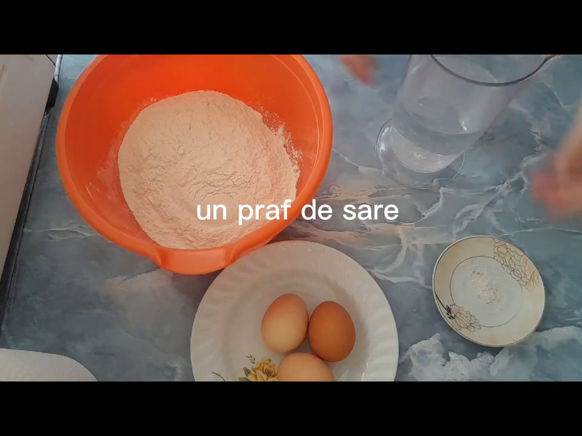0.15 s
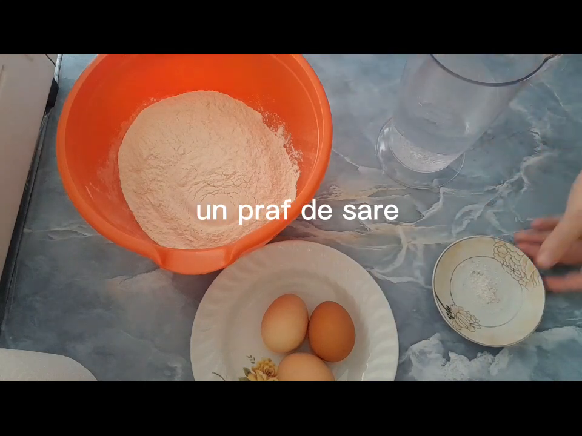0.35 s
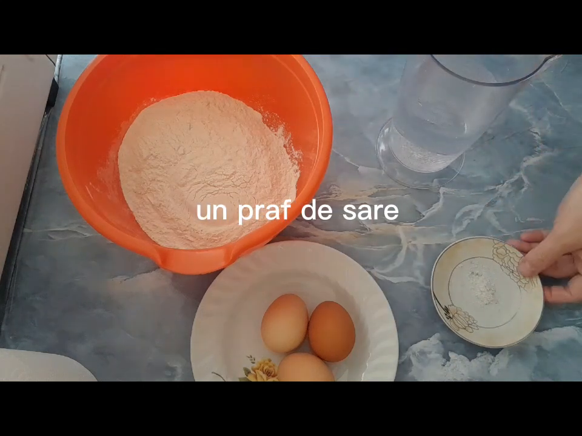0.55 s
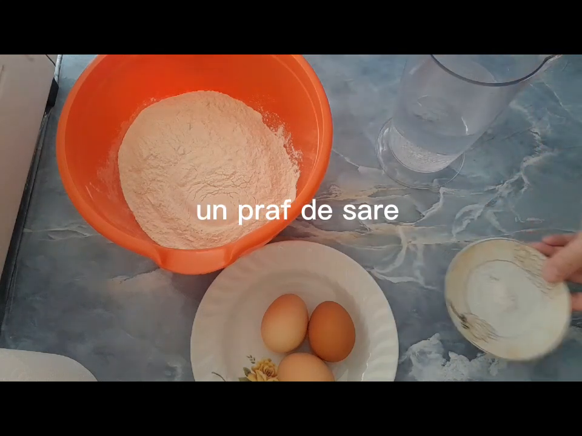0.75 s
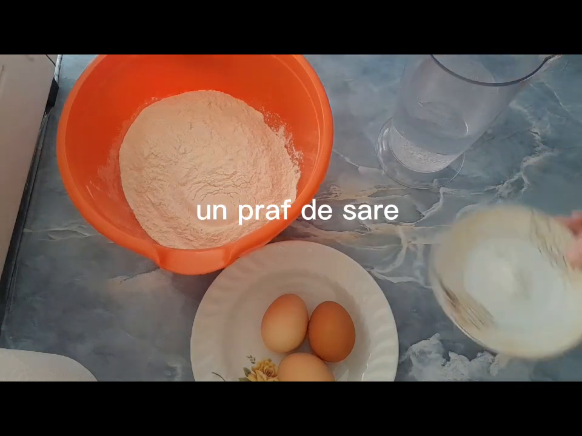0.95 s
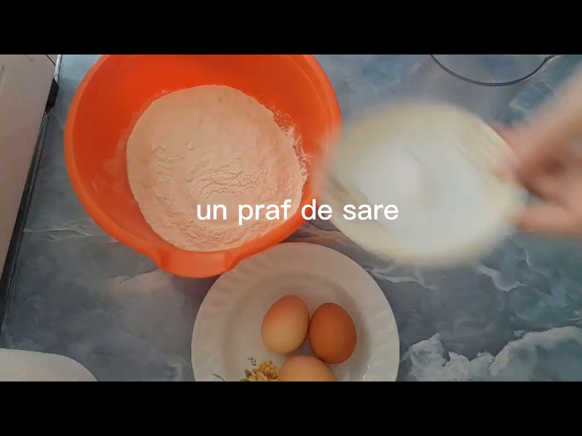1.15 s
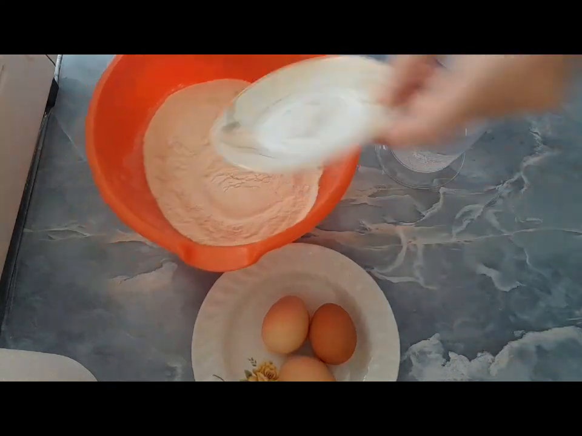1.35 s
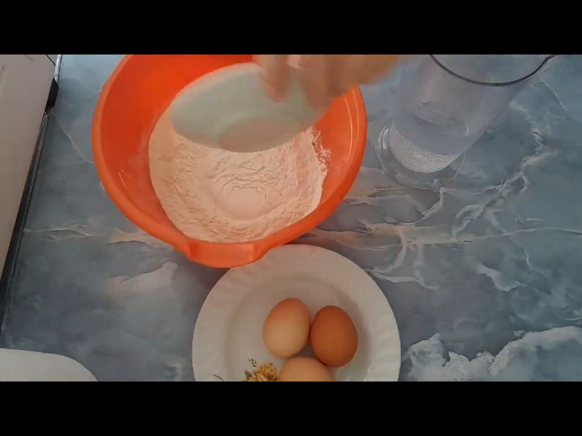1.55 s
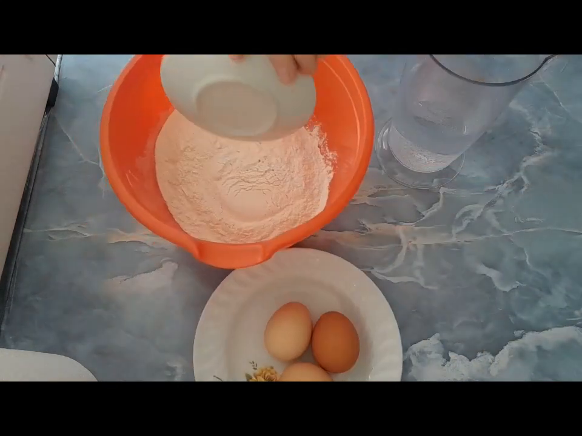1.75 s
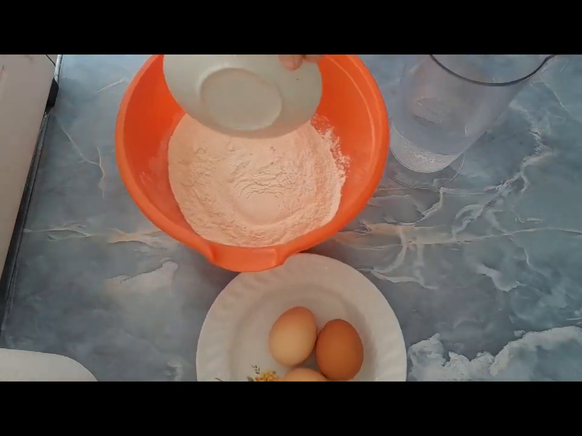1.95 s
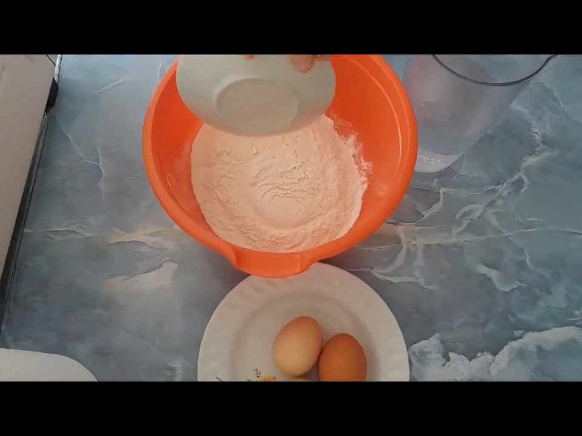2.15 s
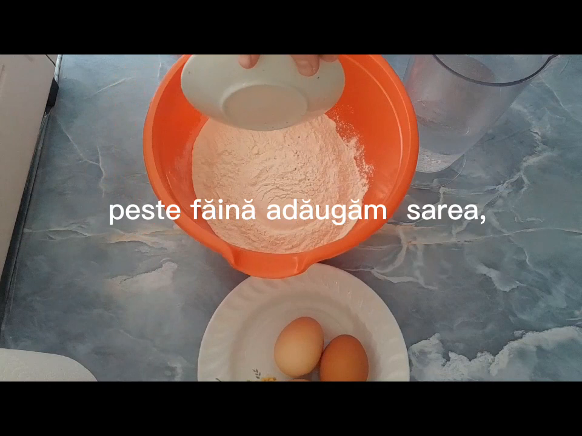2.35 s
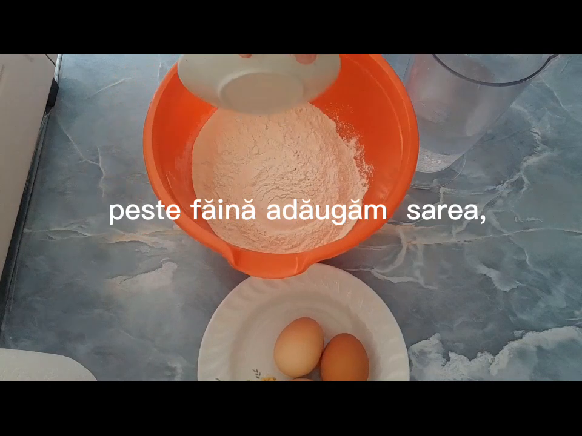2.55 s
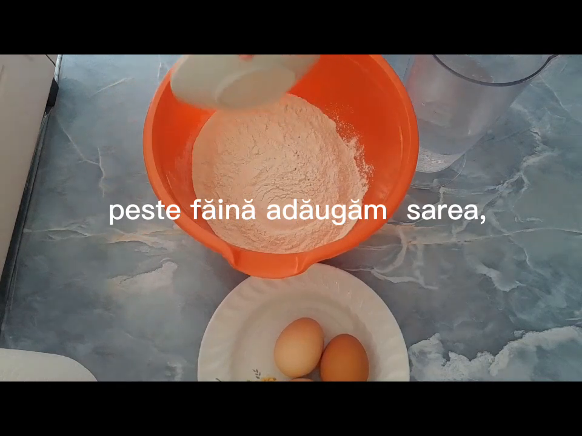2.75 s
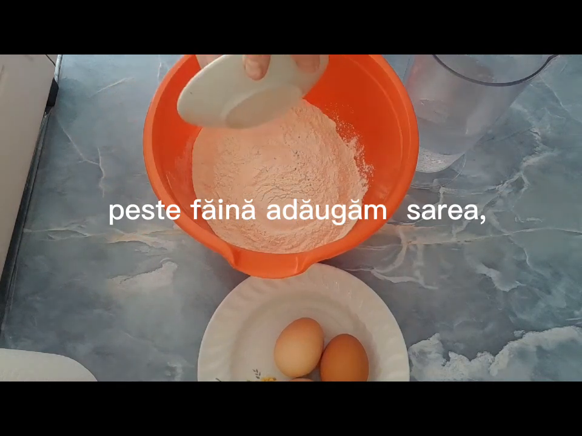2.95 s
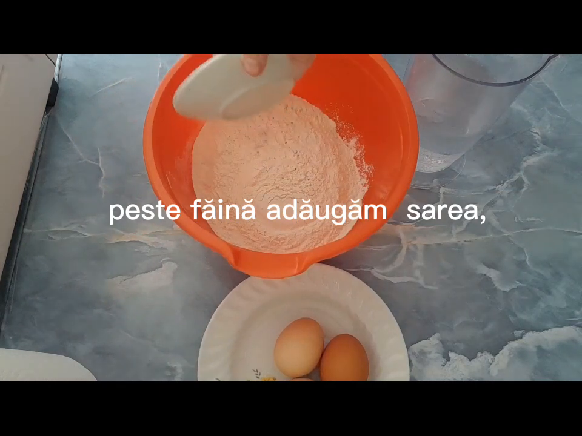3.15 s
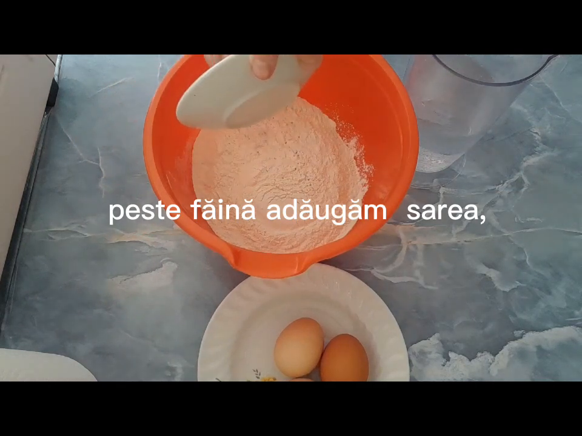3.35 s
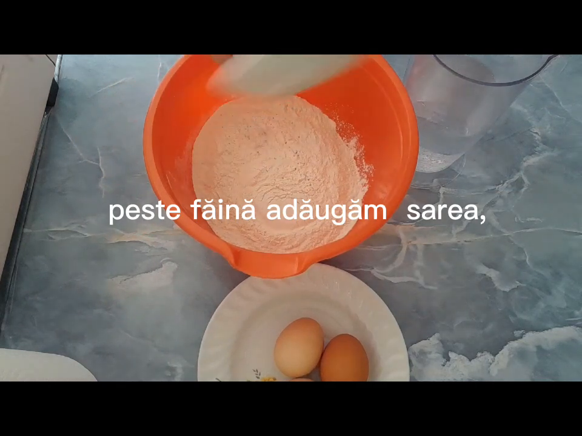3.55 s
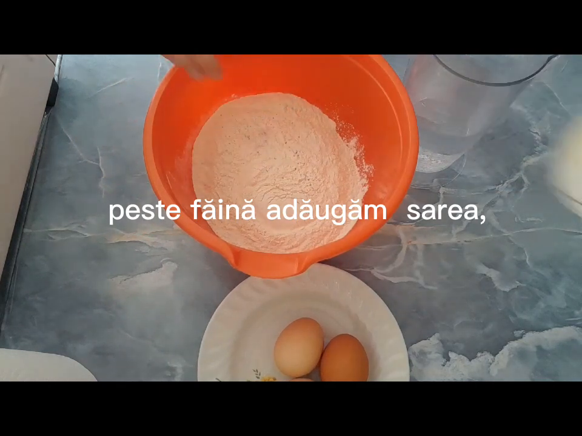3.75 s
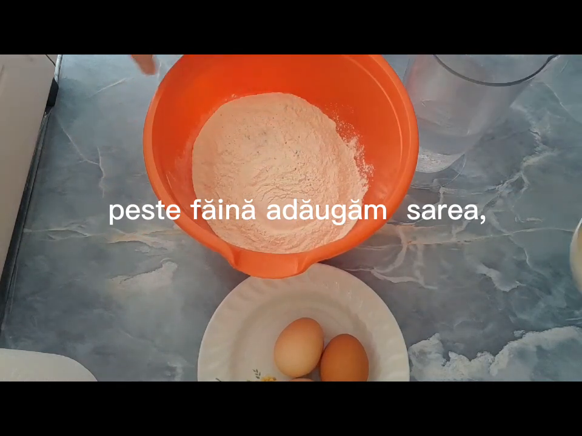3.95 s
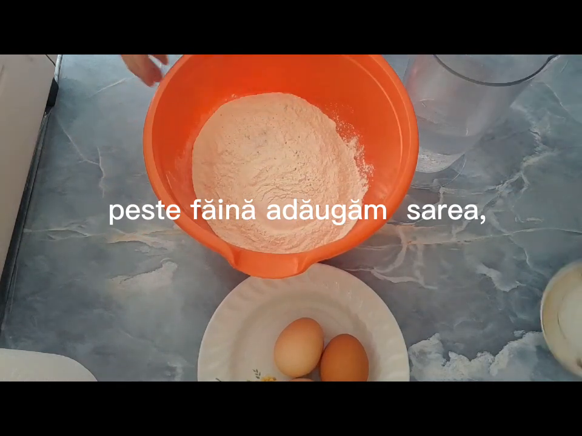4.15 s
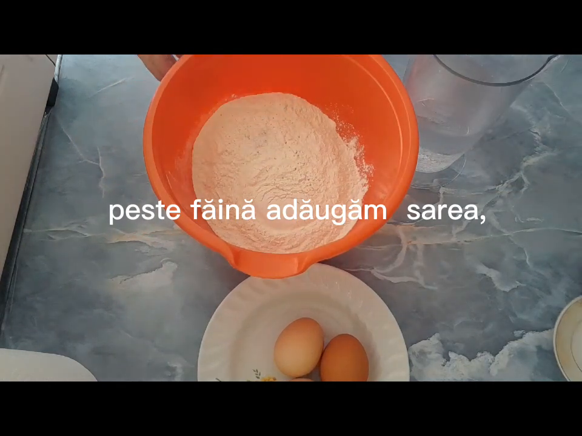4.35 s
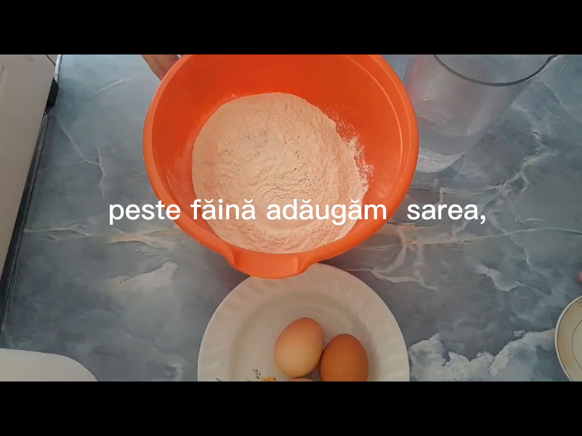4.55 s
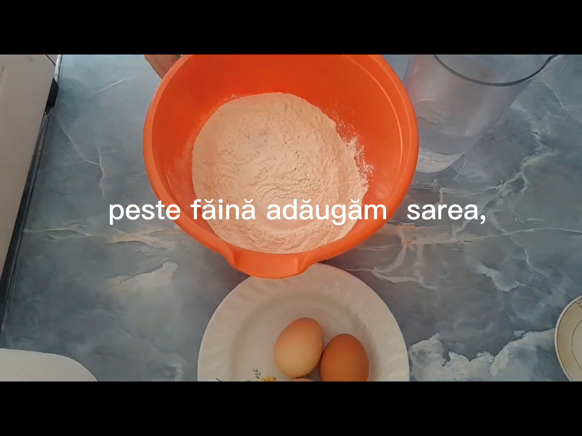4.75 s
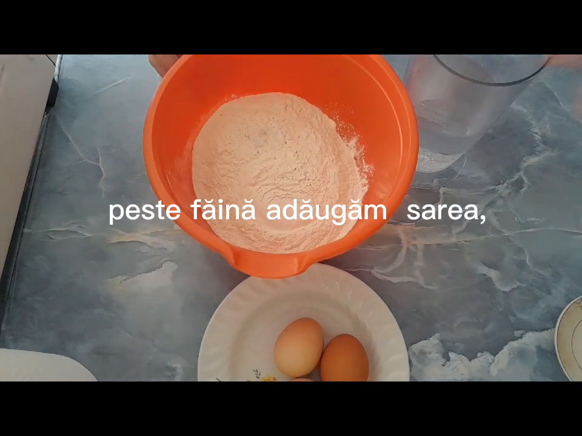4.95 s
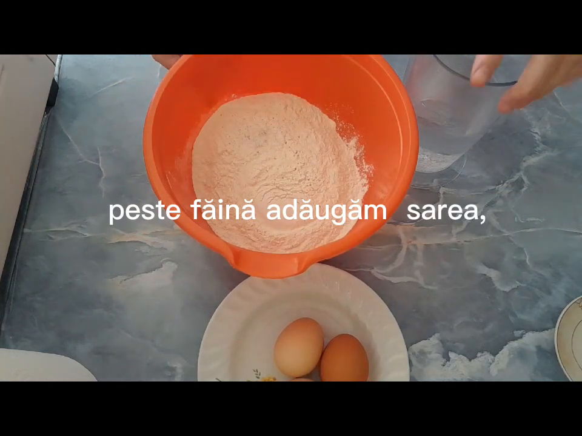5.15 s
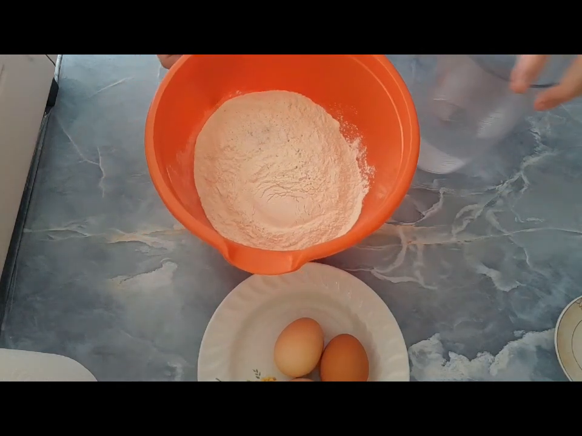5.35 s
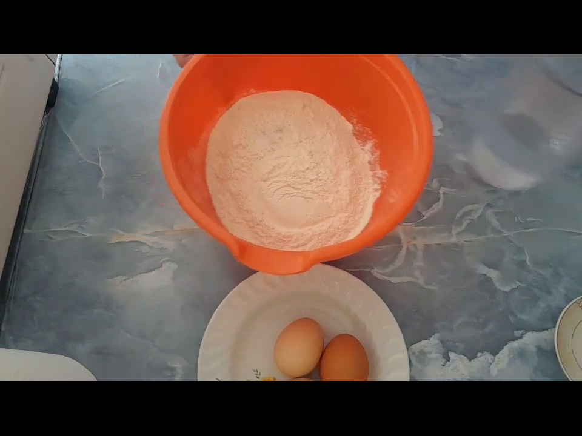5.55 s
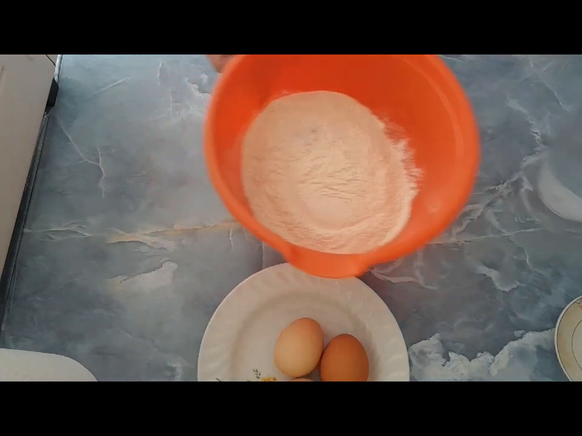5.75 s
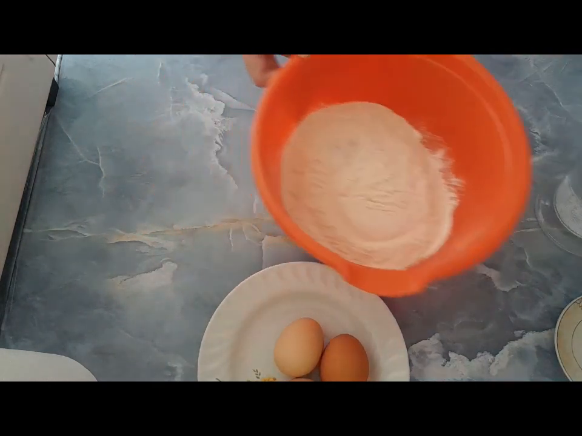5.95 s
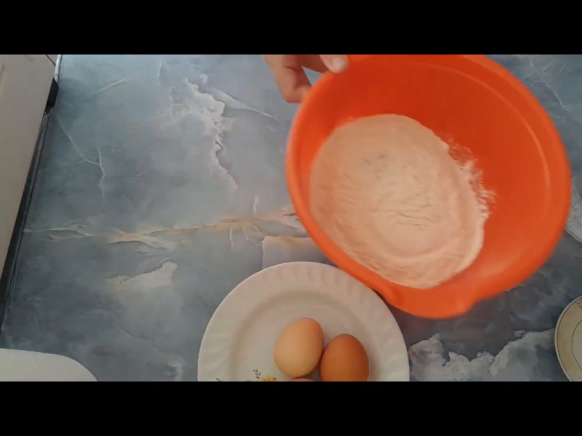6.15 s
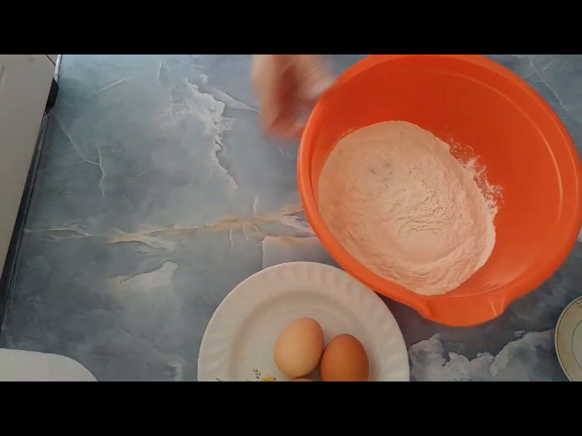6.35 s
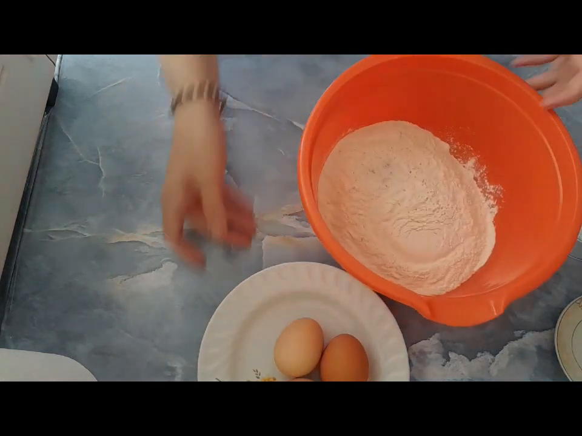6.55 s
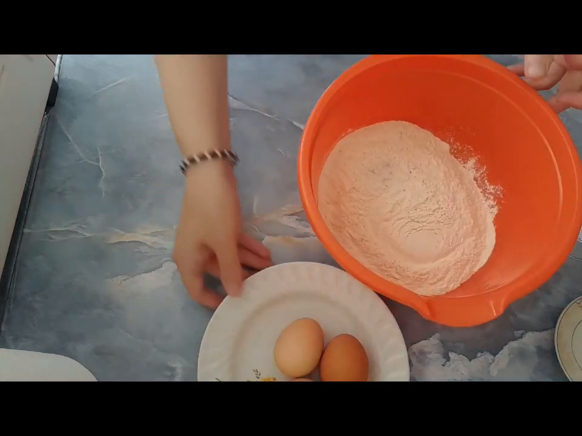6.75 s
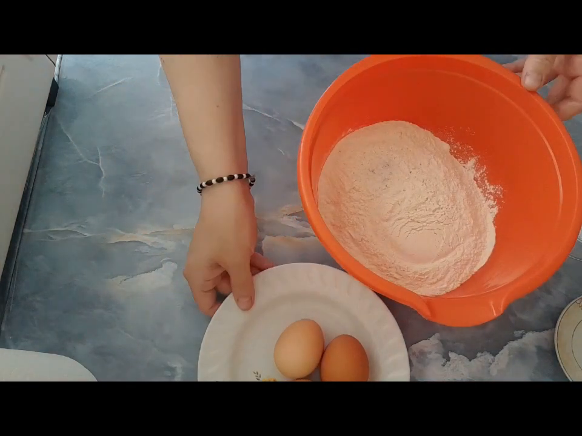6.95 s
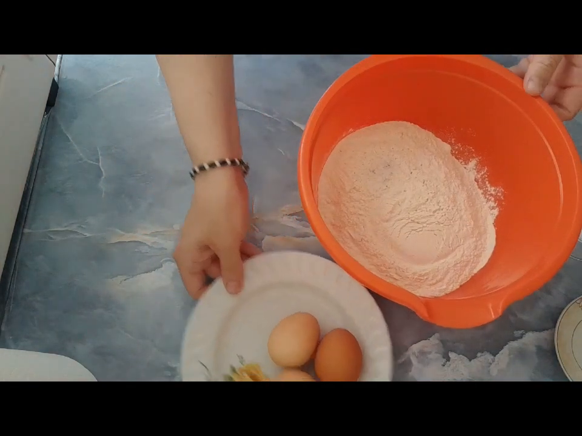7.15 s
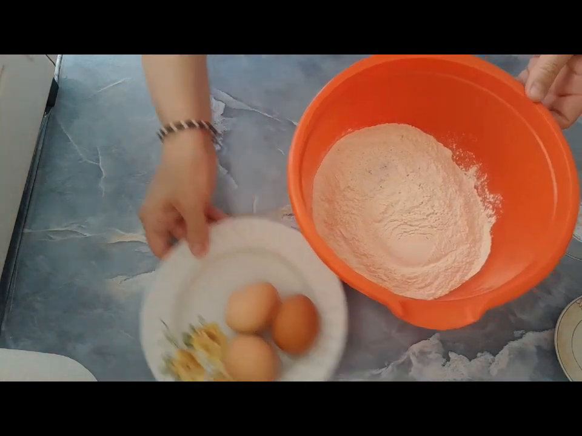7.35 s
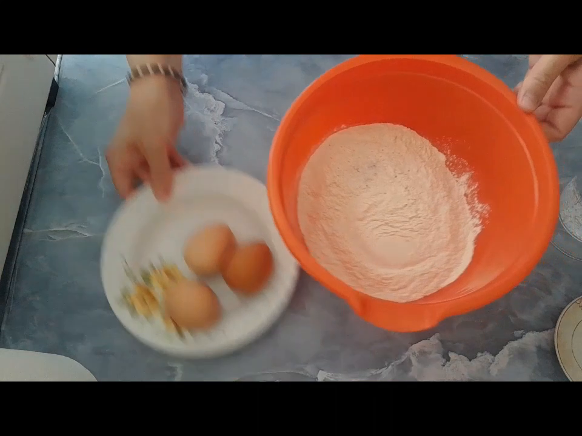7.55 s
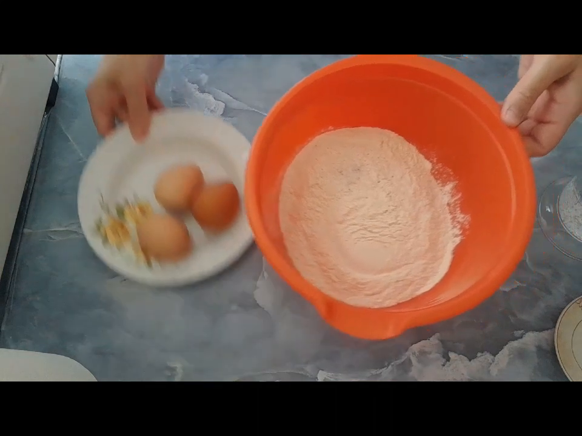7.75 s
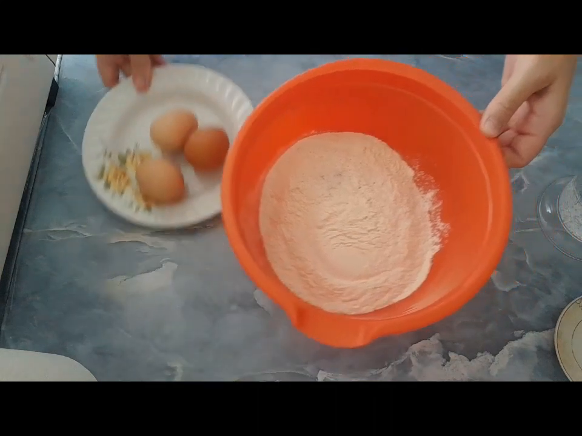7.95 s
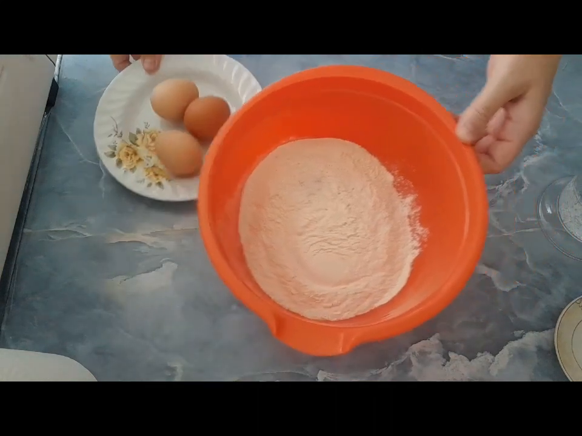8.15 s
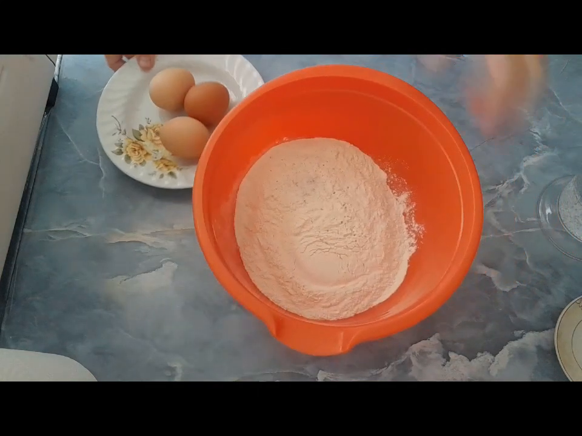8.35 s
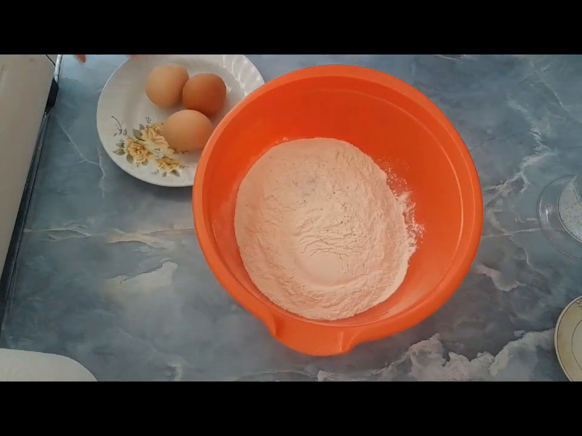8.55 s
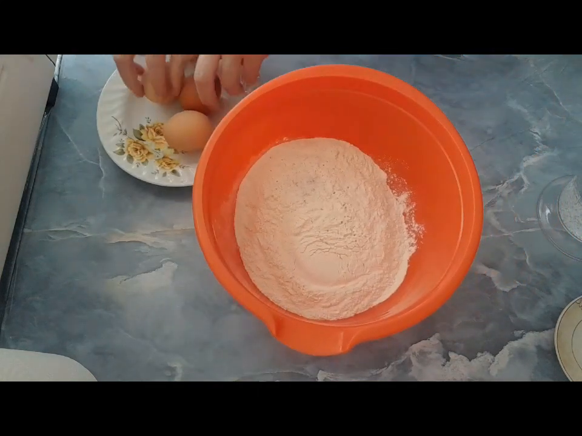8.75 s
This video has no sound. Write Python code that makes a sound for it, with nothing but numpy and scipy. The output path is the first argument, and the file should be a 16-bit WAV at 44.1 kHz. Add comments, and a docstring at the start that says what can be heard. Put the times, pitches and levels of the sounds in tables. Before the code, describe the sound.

A small, fairly dry kitchen heard closely in stereo, with very quiet air and a deep hum that wavers as hands lean on the table. Until 2 s there are faint skin rustles, small china ticks near 0.9 and a dull knock at 1.0, softer thumps at 1.8-1.9. At 2.15-2.25 comes a strong low thump with crisp clacks. From 2.5 to 3.5 a tiny rattle, dry brushing of salt and light nail taps on a saucer. A woody double knock lands at 4.26, another with a soft rub at 4.55, then near quiet. From 5.5 to 6.4 a plastic bowl slides with low drumming and thuds at 5.9 and 6.06; a hard knock at 6.54. From 7.05 to 8.25 a china plate scrapes, ringing brightly, with a clack at 7.24 and irregular bumps. After 8.35, faint eggshell ticks and rocking on china.

```python
"""Hands knock and lean on a kitchen table over still air and a wavering hum, then brush and tap a saucer;
a jug, a plastic bowl and a plate are moved in turn, and at the end eggs rock on the resting plate.
Rubs and knocks force the damped modes of the table top, and the china rings by modes of its own; dry
sliding is shaped noise, small contacts are dying bursts of noise, pushes leave low tones that linger,
and a small room answers the sharp sounds."""
import sys
import numpy as np
from scipy import signal
from scipy.fft import rfft, irfft, next_fast_len
from scipy.io import wavfile
from scipy.ndimage import uniform_filter1d

SR = 44100
rng = np.random.default_rng(int(sys.argv[2]) if len(sys.argv) > 2 else 0)


def master(y):
    """Save y as 16-bit WAV."""
    cut = np.clip(np.atleast_2d(y).T, -1, 1)
    pcm = np.round(cut * 32767)  # scale
    wavfile.write(sys.argv[1], SR, pcm.astype(np.int16))


N = 392049

# Still air of the room, spectrum: [f/Hz, relative density/dB per Hz]
AIR_SPECTRUM = [(18, -72), (30, -11), (64, 3), (88, -1.5), (250, -51.5), (457, -44.5), (1110, -58),
                (15600, -60)]
# Decay of the room: [f/Hz, t60/s]
ROOM_DECAY = [(100, 0.65), (2000, 0.33), (14000, 0.15)]
# Deepest sway of the table, as hands lean on it: [t/s, level/dB]
HUM_LEVEL = [(0.0, -51), (0.25, -80), (1.05, -65), (1.63, -103), (2.21, -41), (2.6, -93), (3.08, -57.5),
             (3.6, -83.5), (4.3, -72), (4.9, -63), (5.43, -65), (5.58, -49.5), (5.79, -72), (5.91, -49),
             (6.2, -42), (6.45, -61), (6.58, -37), (6.98, -88), (7.54, -69), (8.4, -51), (8.88, -91)]
# Low tones lingering after a push: [start t/s, end t/s, starting level/dB, f/Hz]
LOW_TONES = [(3.106, 3.66, -66.5, 61.7), (3.863, 4.498, -69, 58.8), (4.58, 5.22, -54.5, 60.4)]
# Skin, cloth and salt brush past: [peak t/s, level/dB, rise/s, fall/s, tilt/dB per octave]
SKIN_BRUSHES = [(0.12, -61.5, 4.1, 0.13, 1), (0.29, -61, 0.099, 0.12, 1.5), (0.45, -72, 0.21, 0.51, 0),
                (0.92, -53.5, 0.11, 0.15, -4), (1.29, -71.5, 0.15, 0.47, -1), (1.58, -70, 0.053, 0.18, 9),
                (1.67, -60.5, 0.0098, 0.058, 1.5), (1.76, -62.5, 0.11, 0.4, -2),
                (2.16, -45, 0.34, 0.065, -3.5), (2.26, -56.5, 0.19, 0.092, -2),
                (2.72, -75.5, 0.13, 0.67, -4), (2.92, -54, 0.045, 0.033, 2), (3.0, -63.5, 0.49, 0.33, 5),
                (3.29, -55, 0.059, 0.074, 2.5), (3.49, -49.5, 0.038, 0.028, 11.5),
                (3.68, -65, 0.05, 0.079, 7.5), (3.87, -64, 0.084, 0.098, -4.5),
                (4.265, -59, 0.0096, 0.87, -5.5), (4.4, -45, 0.077, 0.066, -9), (4.49, -49, 0.07, 0.19, -7),
                (4.568, -34.5, 0.012, 0.12, -10.5), (4.8, -59, 0.06, 0.23, -7.5),
                (5.16, -66.5, 0.095, 0.74, 0), (6.54, -42.5, 0.013, 0.12, -3),
                (6.67, -50, 0.12, 0.056, -5.5), (6.97, -55, 0.17, 0.079, -4),
                (8.4, -58.5, 0.73, 0.31, -4.5), (8.88, -59, 0.21, 0.058, 0.5)]
# Dry sliding, spectrum: [f/Hz, relative density/dB per Hz]
SLIDE_SPECTRUM = [(410, -4), (700, -8), (1030, -9), (2310, -1.5), (3940, -4), (4490, -0.5), (8490, -6.5),
                  (9670, -2.5), (13200, -1.5), (15600, -13)]
# Bowl and plate dragged across the table: [t/s, hiss level/dB, relative drumming level of low modes/dB,
# upper modes re low/dB, tilt of low modes/dB per octave]
BOWL_DRAGGED = [(5.44, -78.5, -57.5, -40, 23), (5.58, -56, -49.5, -1, 5.5), (5.74, -54.5, -51.5, -16, -5),
                (5.83, -57.5, -50, -23, 0), (5.95, -52, -50.5, 2, 0), (6.13, -51, -30.5, -20.5, -4.5),
                (6.22, -53.5, -41.5, -8, -4), (6.33, -61, -50, -15, -13), (6.47, -73, -44, -33, 6.5),
                (6.52, -63, -37.5, -12, -13)]
PLATE_DRAGGED = [(7.035, -64.5, -49, -21, -4), (7.14, -58.5, -43, -6, 21.5), (7.25, -48.5, -29, -10.5, 3),
                 (7.36, -53.5, -30, -8.5, 12.5), (7.56, -50.5, -25.5, -9.5, 5.5), (7.76, -51.5, -33, -6, 9),
                 (7.98, -55, -35, -8, 23), (8.13, -55.5, -37.5, -17, 0), (8.22, -53.5, -40, -8.5, 0),
                 (8.29, -64.5, -66, 4, 22)]
# Small hard contacts: [t/s, relative peak/dB, centre f/Hz, width/octaves, t60/s]
HARD_TICKS = [(0.117, -40, 12340, 0.3, 0.13), (0.27, -51.5, 1940, 0.32, 0.3),
              (0.7867, -52.5, 4630, 0.33, 0.063), (0.8575, -43, 2870, 0.48, 0.12),
              (0.8985, -38, 3500, 0.71, 0.07), (0.925, -38, 5640, 0.18, 0.057),
              (0.9802, -35, 3100, 0.82, 0.042), (1.2785, -56, 2900, 0.16, 0.24),
              (1.733, -35, 5250, 3.3, 0.047), (1.735, -40.5, 5250, 0.053, 0.065),
              (2.1441, -15.5, 3600, 1, 0.024), (2.18, -22.5, 5400, 0.13, 0.015),
              (2.1987, -26, 2130, 1.36, 0.033), (2.2396, -20.5, 2700, 0.67, 0.032),
              (2.5646, -46.5, 5650, 3.1, 0.051), (3.1762, -50.5, 7970, 1.9, 0.15),
              (4.257, -36.5, 2190, 0.36, 0.1), (4.286, -42, 2280, 0.31, 0.17),
              (4.4268, -37.5, 5000, 0.92, 0.077), (4.4614, -33, 4500, 1.6, 0.21),
              (4.5734, -29, 3400, 0.46, 0.032), (4.784, -45, 2770, 0.61, 0.13),
              (5.8949, -31.5, 4500, 0.46, 0.06), (6.2966, -34.5, 2300, 0.41, 0.031),
              (6.3401, -30.5, 2050, 1.03, 0.095), (6.529, -20.5, 2420, 0.85, 0.034),
              (6.545, -14.5, 2500, 1.1, 0.029), (7.135, -36.5, 5900, 0.086, 0.047),
              (7.2385, -19, 3270, 2.1, 0.022), (7.2753, -32, 4610, 1.1, 0.038),
              (8.2092, -25.5, 4350, 1, 0.02), (8.2403, -27, 2700, 0.76, 0.028),
              (8.3706, -38, 2780, 3.1, 0.034), (8.4805, -30.5, 6000, 0.14, 0.029),
              (8.506, -39.5, 6000, 1.9, 0.087), (8.5772, -43, 3280, 4.2, 0.046),
              (8.7272, -53, 3500, 6.5, 0.063), (8.8106, -39, 3400, 5.5, 0.063),
              (8.852, -44.5, 4470, .05, 0.22)]
# Fingernail ticks on the china, with a common pitch: [t/s, relative peak/dB]
FINGERNAIL_TICKS = [(8.3704, -40), (8.4802, -29), (8.506, -42), (8.579, -42), (8.624, -47), (8.728, -42),
                    (8.809, -34.5)]
# Faint fast rattles: [start t/s, first relative peak/dB, first gap/s, end t/s]
RATTLE_RUNS = [(2.553, -53, .012, 2.57), (2.601, -49, .025, 2.685), (2.702, -47, .022, 2.835)]
# Modes of the saucer: [f/Hz, relative level/dB, longest t60/s]
SAUCER_MODES = [(2570, -12, .025), (5290, 2, .032), (5450, -2, .022), (5600, 1, .012), (7280, -9, .05),
                (7460, -3, .035), (8220, -2, .015), (10850, -2, .055), (11400, -3, .04), (14900, -6, .025)]
# Fingers brush the saucer: [start t/s, end t/s]
SAUCER_STROKES = [(2.82, 2.99), (3.18, 3.4), (3.43, 3.55)]
# A fingernail taps the saucer: [t/s, relative peak/dB]
NAIL_TAPS = [(2.915, -53), (3.258, -52), (3.291, -47), (3.465, -41.5), (3.491, -49)]
# Modes of the plate: [f/Hz, relative level/dB, longest t60/s]
PLATE_MODES = [(2340, -18, .06), (3200, -6, .08), (3255, 0, .11), (4600, -3, .05), (4720, -1, .045),
               (4830, 2, .06), (4930, -4, .035), (5900, -15, .05), (6500, 0, .07), (9830, -10, .035),
               (12100, -12, .03), (12600, -11, .045), (13000, -15, .045)]
# Clinks on the plate: [t/s, relative peak/dB, tilt/dB per octave away from 3200 Hz]
CLINKS = [(1.656, -64.5, -13), (2.446, -82, -23), (7.138, -71, -16), (7.2376, -50, -2.5),
          (7.2747, -66.5, 14.5), (7.951, -58, -27), (8.555, -66, -14), (8.736, -65, -28), (8.795, -67, -28)]
# The rim of the dragged plate touches the table: (start t/s, end t/s)
RIM_CONTACT = (7.08, 8.1)
# Eggs rock on the resting plate: [start t/s, end t/s]
EGG_ROCKING = [(8.41, 8.46), (8.555, 8.66), (8.735, 8.89)]
# Modes of the table top: [f/Hz, relative level/dB, longest t60/s]
TABLE_MODES = [(115.6, 5.5, 0.37), (141.8, -7, 0.51), (160.5, 5.5, 0.22), (188, -11, 0.33),
               (220.2, 1.5, 0.22), (248.3, 1, 0.11), (277, -0.5, 0.074), (311.9, -9, 0.19),
               (338.8, -12, 0.29), (413.5, -27.5, 0.52), (512.8, -1.5, 0.16), (554, 5, 0.11),
               (587.4, 6.5, 0.11), (630, -4, 0.052), (685, -4.5, 0.12), (767, -1.5, 0.15),
               (815.7, -1, 0.15), (847.6, -8.5, 0.24), (927, -13, 0.24), (1215, -8, 0.11), (1283, -6, 0.14),
               (1550, -17.5, 0.12), (1710, -18.5, 0.14), (2005, -16.5, 0.14), (2560, -27, .11),
               (2780, -23.5, 0.09)]
# Knocks on the table: [t/s, relative peak/dB, upper modes re low/dB, tilt of low modes/dB per octave]
TABLE_KNOCKS = [(0.591, -49.5, 8.5, 27), (0.796, -34, -21, -3), (0.98, -17.5, -11.5, 2.5),
                (1.782, -35.5, -20, -2), (1.905, -26.5, -33, -6), (2.181, -5, -38, 4),
                (2.242, -35, -17, 17), (4.256, -17, 6.5, -2), (4.285, -12, 2, 2.5), (4.555, -16.5, 6.5, -5),
                (5.528, -24, -41, -6.5), (5.893, -7.5, -21, -4), (6.06, -13.5, -18.5, 0.5),
                (6.345, -16.5, -17, -1), (6.528, -26, -1, -9), (6.542, -6, -10.5, 7.5),
                (7.066, -20, -25, 4.5), (7.165, -24, -7, 7), (7.237, -10.5, -1, 6.5), (7.272, -26, 13, 13),
                (7.404, -31, 12.5, 2), (7.429, -20.5, -6, -8), (7.524, -22.5, 9.5, 4),
                (7.552, -14, -15, 12), (7.625, -19.5, 1.5, 3), (7.901, -21, -14, 5), (7.983, -15.5, -1, 15),
                (8.175, -20.5, -11.5, 6), (8.353, -20.5, -13, 13.5), (8.385, -39, -10, 15),
                (8.508, -39, 4, -7), (8.58, -37.5, -14, 18), (8.623, -50, 11.5, 25), (8.665, -44, -32, 23),
                (8.739, -41.5, 12.5, 22), (8.754, -48, 13, 12), (8.769, -44, 13, 24)]
# A hand leans, presses or pushes: [peak t/s, relative level of low modes/dB, rise/s, fall/s,
# upper modes re low/dB, tilt of low modes/dB per octave]
HAND_LEANS = [(0.0, -50.5, 0.11, 0.13, -21, -17.5), (0.5, -55.5, 0.21, 0.081, -13, -1),
              (0.66, -50, 0.18, 0.11, -18, -14), (1.05, -63, 0.054, 0.39, -49, -7),
              (1.4, -64, 0.79, 0.13, -8.5, 6), (1.96, -43.5, 0.2, 0.25, -13, 2.5),
              (2.14, -29.5, 0.07, 0.13, -20.5, -9), (2.42, -62, 0.071, 0.43, -6, 35),
              (2.8, -51.5, 0.29, 0.23, -2, 6), (3.0, -39, 0.25, 0.23, -32, -3),
              (3.78, -40, 0.08, 0.15, -47.5, -5), (4.7, -57.5, 0.59, 0.85, -7, -0.5),
              (5.2, -54, 0.42, 1.8, -47, -13), (8.36, -53.5, 0.11, 0.2, -2, 45.5),
              (8.56, -61.5, 0.53, 0.14, 7, 28), (8.75, -62, 0.024, 0.06, -1, 22),
              (8.88, -49.5, 0.32, 0.44, 1.5, 17.5)]

AIR_DB = -75
HUM_HZ = 56
DRONE_EDGE_S, DRONE_FADE_DB_PER_S = 0.093, 14
SWELL_DB = 20  # rise and fall times count over this many dB
BOWL_TILT, PLATE_TILT = -0.89, -1.5  # hiss of each drag, dB per octave
FINGERNAIL_HZ, FINGERNAIL_OCTAVES, FINGERNAIL_T60 = 9750, 0.15, 0.025
RATTLE_HZ, RATTLE_RING_DB = 5850, -37  # pitch of the bounces; how far they also wake the plate
PLATE_FITS_DB = 4  # how unevenly the rubbed plate sings
ROCK_DB = -4.5  # drive of the rocked plate against the sliding level
PLATE_DRIFT, SAUCER_DRIFT = .005, .004  # spread of the modes' drift, as grip and contact move; share of f
UPPER_HZ = 450  # border of the low and upper modes of the table
UPPER_LUMPS_DB = 6  # how unevenly a rub reaches the upper modes
SHUDDER_DB, SHUDDER_RISE_S, SHUDDER_FALL_S = -22.5, .005, 0.14  # level against the knock
SOFTEST_DB, HARDEST_DB = -16.5, 0  # limits of a shudder's upper modes against its low ones
EDGE_HZ = 15750  # upper band limit
STEP = 64  # samples between the points of a slow curve
FRAMES = N // STEP + 5


def gain_of(db):
    """Amplitude ratio: a level in decibels becomes a factor."""
    return 10 ** (np.asarray(db) / 20)


def evened(x):
    """Normalisation: the signal is scaled to unit rms."""
    return x / np.sqrt(np.mean(abs(x) ** 2) + 1e-20)


def read(points, hz):
    """Interpolation over logarithmic frequency: a table is read at the given frequencies."""
    f, value = np.transpose(points)
    return np.interp(np.log(hz + 1), np.log(f + 1), value)


def follow(rows, t):
    """Interpolation over time: the columns of a curve at t; the level is silence outside the curve."""
    s, level_db, *rest = np.transpose(rows)
    return [np.interp(t, s, level_db, -150, -150)] + [np.interp(t, s, c) for c in rest]


def at_each_sample(curves):
    """Interpolation between slow points: one value in every STEP samples becomes one in each."""
    return [np.interp(np.arange(N), np.arange(len(c)) * STEP, c) for c in curves]


def swells(rows, drags, t):
    """Addition of powers: swells and drags sum, and further columns are averaged by power."""
    s, db, rise, fall, *rest = np.array(rows).T[..., None]
    late = t - s
    drop = np.maximum(-late / np.maximum(rise, .005), late / np.maximum(fall, .005))
    levels_db = np.vstack([db - SWELL_DB * drop, [d[0] for d in drags]])
    power = gain_of(2 * np.maximum(levels_db, -150))
    total = power.sum(0)
    columns = [np.vstack([c + 0 * t, [d[k + 1] for d in drags]]) for k, c in enumerate(rest)]
    return [10 * np.log10(total)] + [(power * c).sum(0) / total for c in columns]


def grit(lumpy_db, size):
    """Stick and slip: a rough contact gives noise whose strength jumps about."""
    lumps = evened(uniform_filter1d(rng.standard_normal(N), size=size))
    return evened(rng.standard_normal(N) * gain_of(lumpy_db * lumps))


def ring(force, hz, t60, apart, drift=0):
    """Forced damped oscillation: one drifting mode, heard `apart` radians out of step by two microphones."""
    pole = np.exp((2j * np.pi * hz - np.log(1000) / t60) / SR)
    bend = 1
    if drift:
        knots = N // 2000 + 2
        wander = np.interp(np.arange(N), np.arange(knots) * 2000, rng.standard_normal(knots))
        bend = np.exp(2j * np.pi * np.cumsum(drift * hz * wander) / SR)
    motion = bend * signal.lfilter([1], [1, -pole], force / bend)
    return np.array([motion.imag, (motion * np.exp(1j * apart)).imag])


def impulse(hz, soft_s):
    """Finite contact time: a mode builds up over about a cycle, and a soft touch takes longer."""
    push = np.hanning(int(.9 * SR / hz) + 3)
    touch = np.hanning(int(soft_s * SR) + 3)[1:-1]
    turn = np.cos(2 * np.pi * hz * np.arange(int(soft_s * SR) + 1) / SR)
    return np.convolve(push / push.sum(), touch * turn / np.sum(touch * turn ** 2))


def body(modes, rub_db, blows, blow_db, lumpy_db, size, apart_per_khz, soft_s=0, drift=0):
    """Modal superposition: modes are fed by a rough contact and by blows, mostly of one sign."""
    hz, db, t60 = np.transpose(modes)
    t60 = np.minimum(t60, 6 / np.sqrt(hz))  # higher modes lose their energy sooner
    # rms of all modes under unit noise, and their joint peak
    steady = np.sqrt(np.sum(gain_of(2 * db) * t60 * SR / np.log(1000) / 4))
    peak = np.sqrt(np.sum(gain_of(2 * db)))
    chance, sign = rng.standard_normal((2, len(hz), len(blows)))
    out = np.zeros((2, N))
    for k in range(len(hz)):
        force = grit(lumpy_db, size) * gain_of(rub_db(hz[k])) / steady
        push = impulse(hz[k], soft_s)
        strength = np.sign(sign[k] - 1) * gain_of(blow_db(hz[k]) + 3 * chance[k]) / peak
        for s, a in zip(blows, strength):
            start = round(s * SR)
            force[start:start + len(push)] += a * push
        apart = (-1) ** k * apart_per_khz * hz[k] / 1000
        out += gain_of(db[k]) * ring(force, hz[k], t60[k], apart, drift)
    return out


def hiss(db):
    """Spatial coherence: shaped noise is alike in both microphones only in the bass."""
    a, b = rng.standard_normal((2, 2, *db.shape)) * gain_of(db)
    z = a + 1j * b
    same = np.exp(-np.fft.rfftfreq(256, 1 / SR) / 900)[:, None]
    z[1] = same * z[0] + np.sqrt(1 - same ** 2) * z[1]
    return signal.istft(z, nperseg=256, noverlap=192)[1][:, :N]


def room(x):
    """Reverberation: sparse taps of random sign, each band dying at its own speed, differ per microphone."""
    taps = np.zeros((2, SR // 2))
    at = np.arange(200, SR // 2 - 20, 20)
    shape = (2, len(at))
    np.put_along_axis(taps, at + rng.integers(0, 20, shape), rng.choice([-1., 1.], shape), 1)
    hz, t, z = signal.stft(taps, SR, nperseg=256)
    t60 = np.maximum(read(ROOM_DECAY, hz), .05)[:, None]
    tail = signal.istft(z * gain_of(-60 * t / t60), SR, nperseg=256)[1]
    return signal.fftconvolve(x, tail / np.linalg.norm(tail[0]), axes=1)[:, :N]


def hum():
    """Narrow-band resonance: noise drives one low mode, which gives a wavering hum."""
    level_db, = follow(HUM_LEVEL, np.arange(N) / SR)
    return evened(ring(rng.standard_normal(N), HUM_HZ, 0.21, 0.082)) * gain_of(level_db)


def drones():
    """Free decay: each pure tone swells in, fades slowly and is damped by the next touch."""
    t, out = np.arange(N) / SR, np.zeros(N)
    for start, end, db, hz in LOW_TONES:
        edge = np.clip(np.minimum(t - start, end - t) / DRONE_EDGE_S, 0, 1)
        fade = gain_of(db - DRONE_FADE_DB_PER_S * (t - start))
        out += edge * fade * np.sqrt(2) * np.sin(2 * np.pi * (hz * t + rng.random()))
    return out


def slide():
    """Friction noise: level and tilt of all dry sliding, one value in every STEP samples."""
    t = np.arange(FRAMES) * STEP / SR
    drags = [(follow(d, t)[0], tilt + 0 * t)
             for d, tilt in [(BOWL_DRAGGED, BOWL_TILT), (PLATE_DRAGGED, PLATE_TILT)]]
    return swells(SKIN_BRUSHES, drags, t)


def during(spans):
    """Gating in time: the sliding level while the named object is the one that slides."""
    t = np.arange(N) / SR
    inside = np.any([(a < t) & (t < b) for a, b in spans], axis=0)
    return np.where(inside, at_each_sample(slide())[0], -150)


def sliding():
    """Friction of rough surfaces: patchy hiss flickers as the contact catches, over the still air."""
    hz = np.fft.rfftfreq(256, 1 / SR)[:, None]
    level_db, tilt = slide()
    tilt_db = tilt * np.log2(np.maximum(hz, 500) / 5000)
    patches = uniform_filter1d(rng.standard_normal((129, FRAMES)), size=5, axis=0)
    patches = evened(uniform_filter1d(patches, size=40, axis=1))
    flicker = evened(uniform_filter1d(rng.standard_normal(FRAMES), size=5))
    colour_db = read(SLIDE_SPECTRUM, hz) + tilt_db
    colour_db -= 10 * np.log10(np.sum(gain_of(2 * colour_db), axis=0))  # equal power at every tilt
    patchy_db = 2 * patches  # a dry scrape is fairly even
    rub = evened(hiss(colour_db + patchy_db + 1.13 * flicker)) * gain_of(at_each_sample([level_db])[0])
    air = evened(hiss(read(AIR_SPECTRUM, hz) + 2.5 * patches)) * gain_of(AIR_DB)
    return rub + air


def tick(peak_db, hz, octaves, t60):
    """Exponential decay: a burst of noise around a centre frequency dies away."""
    t, f = np.arange(8192) / SR, np.fft.rfftfreq(8192, 1 / SR) + 1
    band = np.exp(-(np.log2(f / hz) / max(octaves, .05)) ** 2 / 2)
    noise = irfft(rfft(rng.standard_normal((2, 8192))) * band)
    decay = gain_of(peak_db - 12.5 - 60 * t / max(t60, .004))
    return evened(noise) * decay * np.minimum(t / 0.00047, 1)


def rattle():
    """Repeated impact: times and peaks of bounces that weaken, their gaps closing towards 16.5 ms."""
    rows = []
    for s, peak_db, gap, end in RATTLE_RUNS:
        while s < end:
            rows.append((s, peak_db))
            s += gap
            gap = max(gap * .75, .0165)
            peak_db -= .9
    return rows


def ticks():
    """Impact noise: single ticks, bounces, and the clatter of many small modes after a hard knock."""
    out = np.zeros((2, N + 8192))
    rows = list(HARD_TICKS)
    for s, peak_db, hard_db, _ in TABLE_KNOCKS:
        upper_db = peak_db + hard_db
        rows.append((s, upper_db - 9.0 + 0.72 * (upper_db + 7.5), 900, .75, .16))
    rows += [(s, peak_db, FINGERNAIL_HZ, FINGERNAIL_OCTAVES, FINGERNAIL_T60) for s, peak_db in FINGERNAIL_TICKS]
    rows += [(s, peak_db, RATTLE_HZ, .07, .022) for s, peak_db in rattle()]
    for s, *shape in rows:
        start = round(s * SR)
        out[:, start:start + 8192] += tick(*shape)
    return out[:, :N]


def saucer():
    """Friction-driven modes: brushing salt off the glaze rings them, a firm stroke most; a nail taps."""
    level_db = during(SAUCER_STROKES)
    s, peak_db = np.transpose(NAIL_TAPS)
    firm_db = level_db + .6 * (level_db + 52)
    return body(SAUCER_MODES, lambda hz: firm_db + 9.0, s, lambda hz: peak_db,
                lumpy_db=4, size=600, apart_per_khz=0.69, drift=SAUCER_DRIFT)


def plate():
    """Selective excitation: dragging sings in high modes, rocking eggs wake low ones; touches clink."""
    drag_db, rock_db = during([RIM_CONTACT]), during(EGG_ROCKING) + ROCK_DB
    bounces = [(s, db + RATTLE_RING_DB, -12) for s, db in rattle()]
    s, peak_db, tilt_db = np.transpose(CLINKS + bounces)

    def rub_db(hz):
        """Stronger contact sets the drive: the greater of the drag and the rocking."""
        dragged = drag_db - 23.0 * max(np.log2(4700 / hz), 0)
        return np.maximum(dragged, rock_db - 3.0 * abs(np.log2(hz / 3200)))

    def blow_db(hz):
        """Spectrum of an impact: each clink tilts away from 3200 Hz."""
        return peak_db + 26.5 + tilt_db * abs(np.log2(hz / 3200))

    sung = body(PLATE_MODES, rub_db, s, blow_db, lumpy_db=PLATE_FITS_DB, size=2600,
                apart_per_khz=0.29, soft_s=0.0038, drift=PLATE_DRIFT)
    return sung * gain_of([[-1.5], [1.5]])


def rubbing():
    """Sustained forcing of the table: leans, drags and the shudder that buzzes on after knocks."""
    t = np.arange(FRAMES) * STEP / SR
    shudders = [(s + SHUDDER_RISE_S, db + SHUDDER_DB, SHUDDER_RISE_S, SHUDDER_FALL_S,
                 np.clip(hard_db, SOFTEST_DB, HARDEST_DB), lean_db)
                for s, db, hard_db, lean_db in TABLE_KNOCKS]
    # the drags without their hiss column
    drags = [follow(np.delete(d, 1, axis=1), t) for d in (BOWL_DRAGGED, PLATE_DRAGGED)]
    return at_each_sample(swells(HAND_LEANS + shudders, drags, t))


def table():
    """Contact hardness: soft contact moves the low modes; hard contact reaches ever higher ones too."""
    level_db, upper_db, tilt_db = rubbing()
    s, peak_db, hard_db, lean_db = np.transpose(TABLE_KNOCKS)
    hard_peak_db = peak_db + hard_db
    low = body([m for m in TABLE_MODES if m[0] < UPPER_HZ],
               lambda hz: level_db + .5 + tilt_db * np.log2(min(hz, 250) / 160),
               s, lambda hz: peak_db - 6.0 + lean_db * np.log2(hz / 160),
               2.85, size=400, apart_per_khz=1.36)
    upper = body([m for m in TABLE_MODES if m[0] > UPPER_HZ],
                 lambda hz: level_db + upper_db - 2.5 - 3.6 * np.log2(hz / 600),
                 s, lambda hz: hard_peak_db - 5.5 + 0.62 * (hard_peak_db + 19.0) * np.log2(hz / 650),
                 UPPER_LUMPS_DB, size=200, apart_per_khz=1.49)
    radiates_hz = 92  # below its first strong mode the top moves little air
    radiation = signal.butter(4, radiates_hz, "high", fs=SR, output="sos")
    return signal.sosfilt(radiation, low + upper) * gain_of([[-.8], [.8]])


def scene():
    """Superposition: all sources add, and the sharp ones also come back from the walls."""
    background = hum() + drones() + sliding()
    small = ticks() + saucer() + plate()
    wood = table()
    return background + small + wood + room(gain_of(-27.0) * wood + gain_of(-8.5) * small)


def record(dry):
    """Microphone response: a notch, a left-right imbalance over frequency, a bass cut and a band limit."""
    size = next_fast_len(N)
    hz = np.fft.rfftfreq(size, 1 / SR)
    notch_db = -8.5 * np.exp(-((hz - 8500) / 450) ** 2)
    # left against right: [f/Hz, level/dB]
    balance = [(1000, 0.0), (4500, -4.5), (7000, -10.0), (9000, 8.5), (15000, 0.5)]
    balance_db = np.array([[.5], [-.5]]) * read(balance, hz)
    heard = irfft(rfft(dry, size) * gain_of(notch_db + balance_db), size)[:, :N]
    low_cut_hz = 46
    heard = signal.sosfilt(signal.butter(4, low_cut_hz, "high", fs=SR, output="sos"), heard)
    band_limit = signal.firwin(511, EDGE_HZ, window=("kaiser", 9), fs=SR)
    return signal.oaconvolve(heard, band_limit[None], "same")


dry = scene()
out = record(dry)
master(out)
```